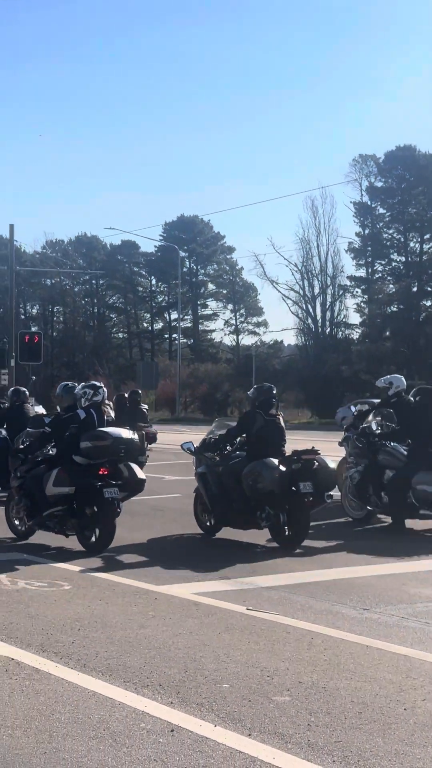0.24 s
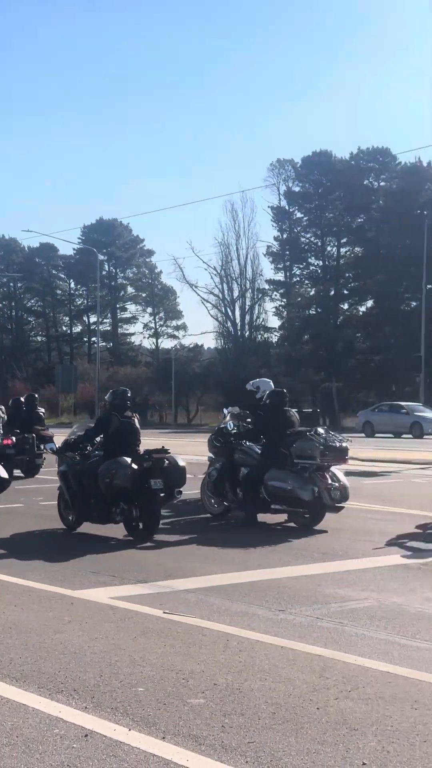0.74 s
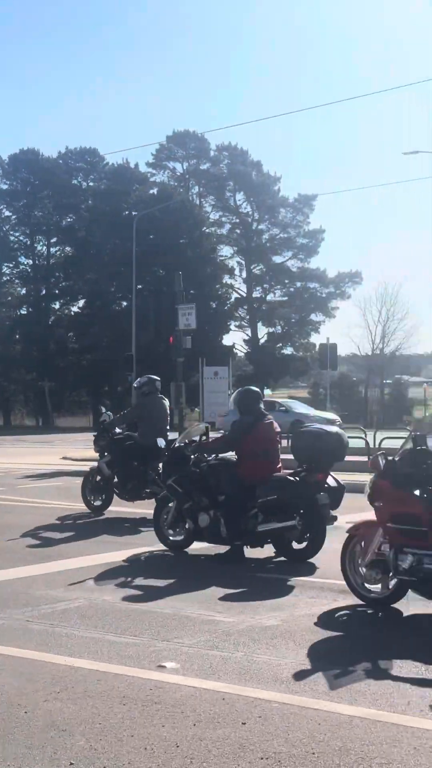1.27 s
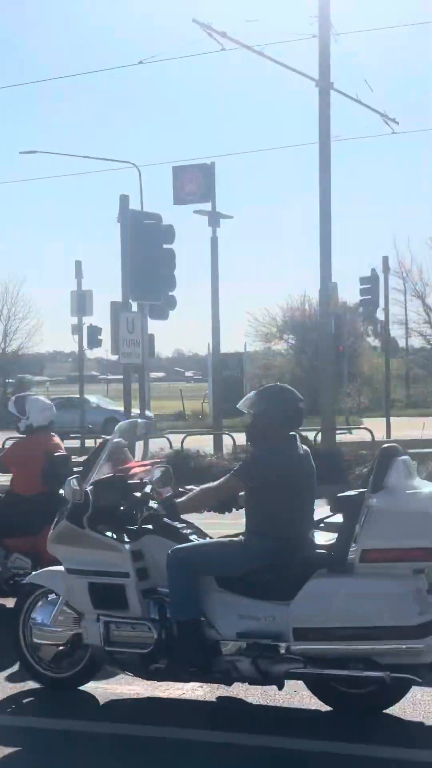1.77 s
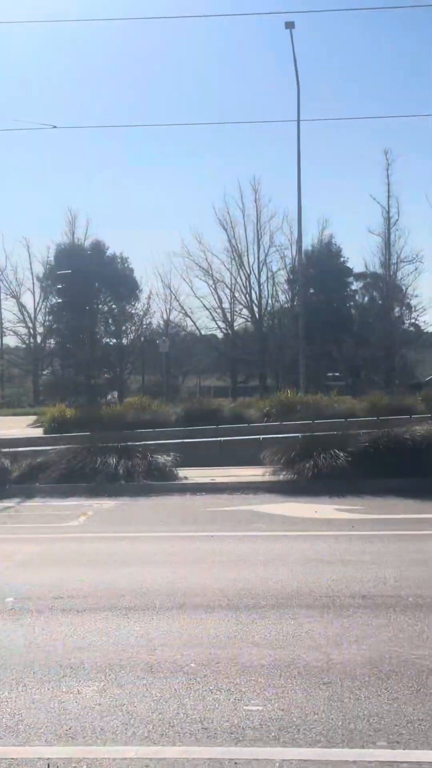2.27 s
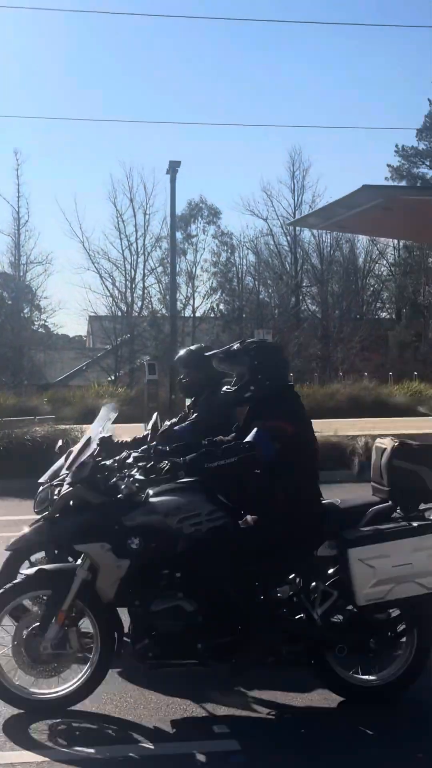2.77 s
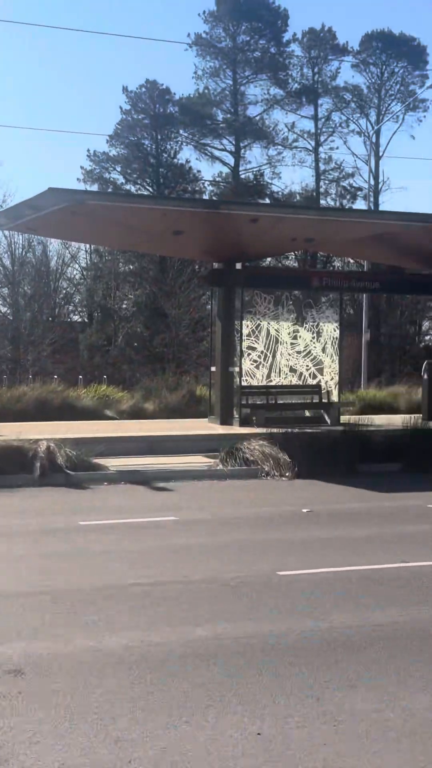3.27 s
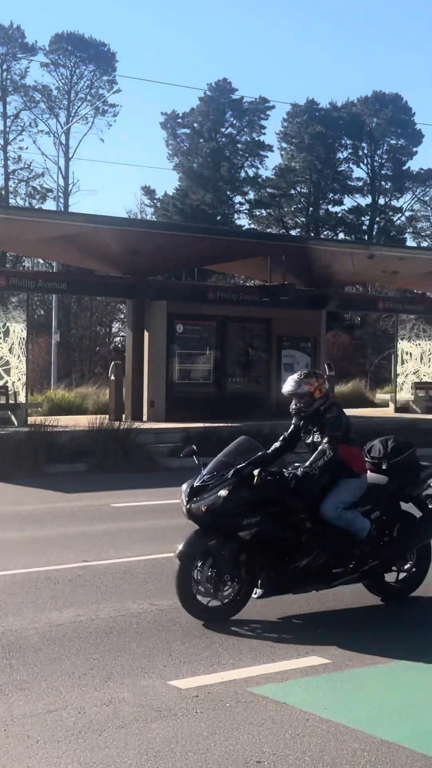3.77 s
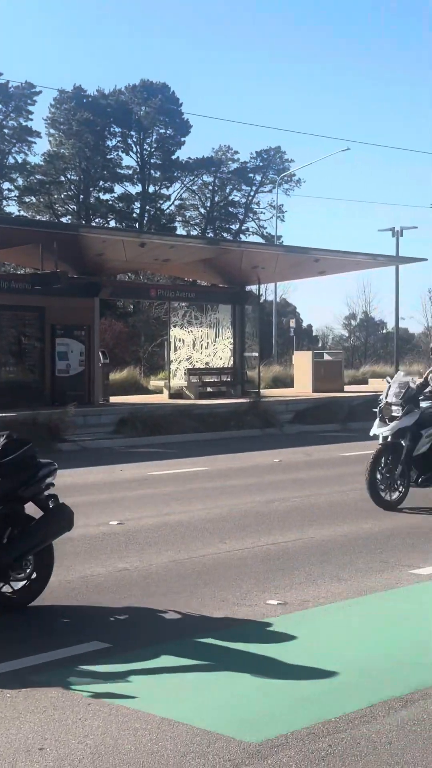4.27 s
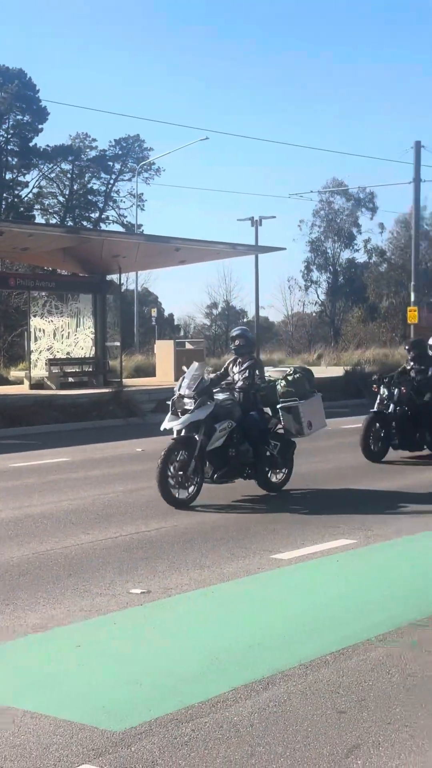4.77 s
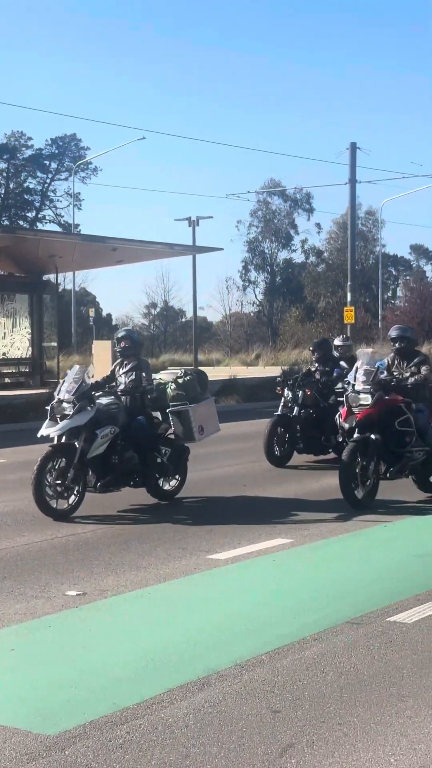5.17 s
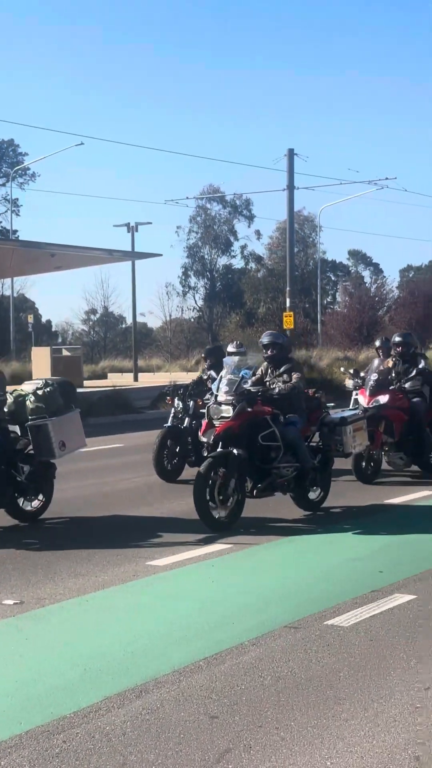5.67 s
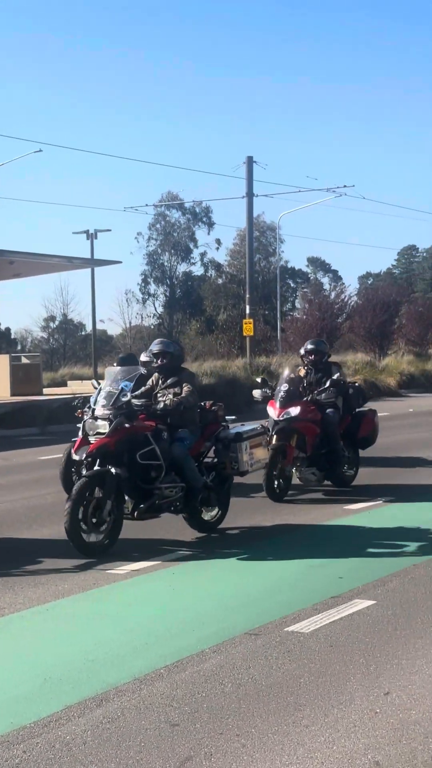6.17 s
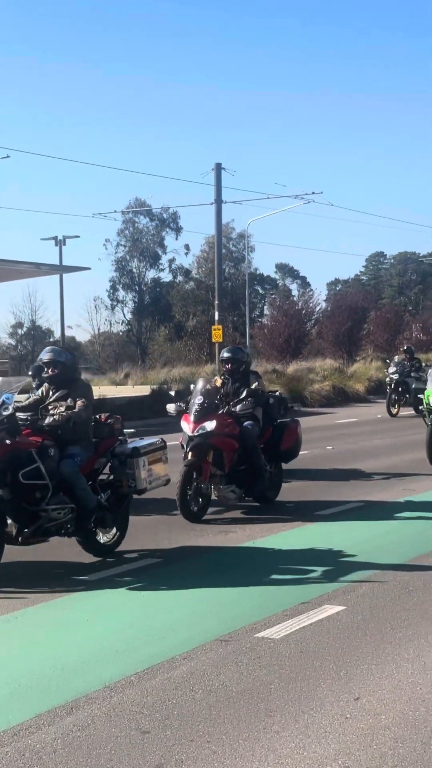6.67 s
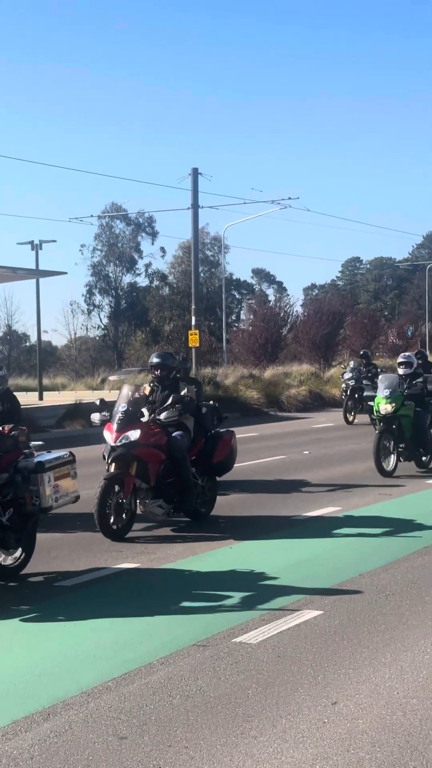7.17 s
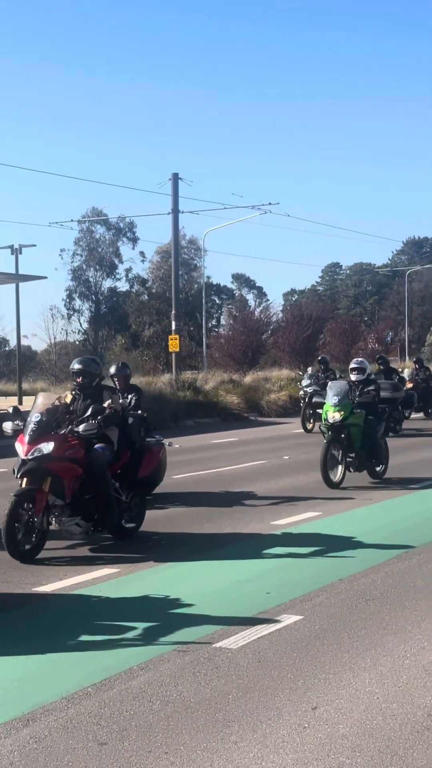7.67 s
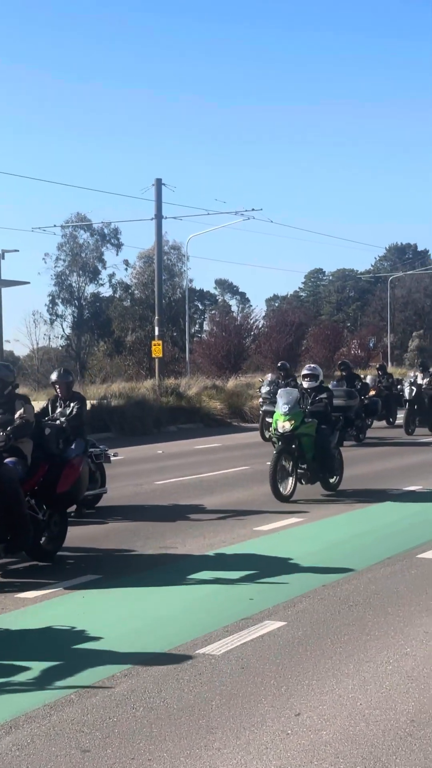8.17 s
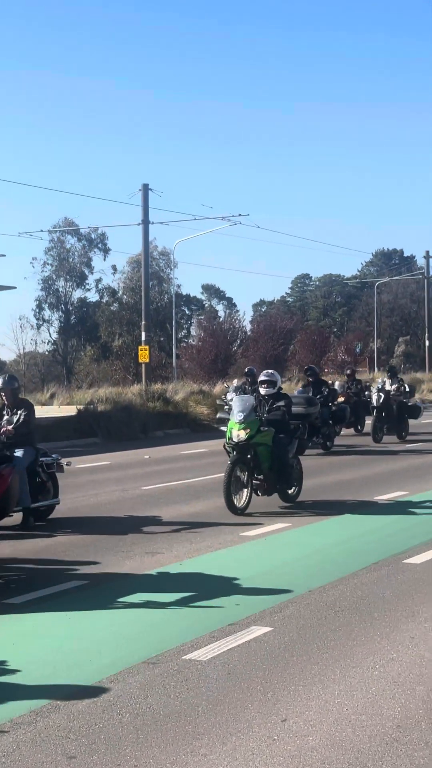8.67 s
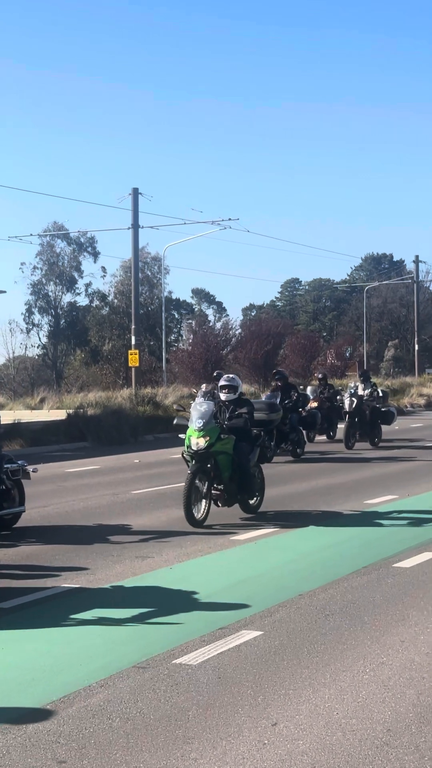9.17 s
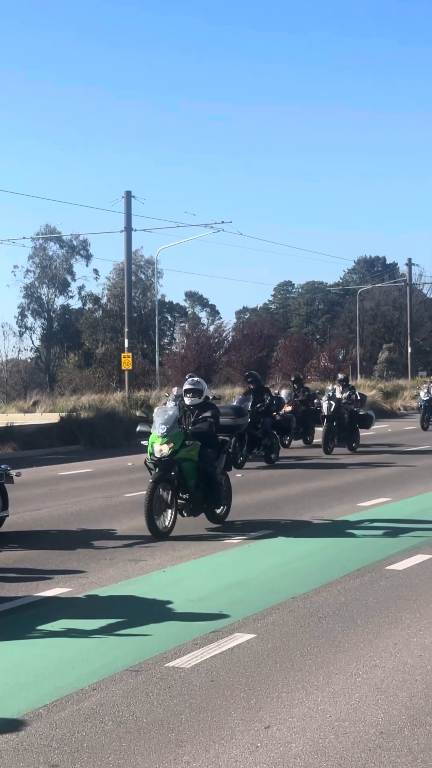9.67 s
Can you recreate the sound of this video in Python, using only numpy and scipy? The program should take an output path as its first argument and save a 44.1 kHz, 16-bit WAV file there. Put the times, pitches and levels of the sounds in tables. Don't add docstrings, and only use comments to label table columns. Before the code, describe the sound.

Many motorcycle engines merge into a low, uneven throb passing close by, with tyre roar, metallic rattle, brake squeaks and single exhaust pops.

```python
import sys
import numpy as np
from scipy import signal
from scipy.fft import rfft, irfft
from scipy.io import wavfile
from scipy.ndimage import uniform_filter1d

SR = 44100
rng = np.random.default_rng(int(sys.argv[2]) if len(sys.argv) > 2 else 0)


def generate_wav(signal):
    frames = np.transpose(np.atleast_2d(signal))
    scaled = np.clip(frames, -1, 1) * 32767
    pcm = np.round(scaled).astype(np.int16)
    wavfile.write(sys.argv[1], SR, pcm)


def amplitude_ratio(level_db):
    exponent = np.asarray(level_db, float) / 20
    return 10 ** exponent


N = 437472
TIME = np.arange(N) / SR


def evened(x):
    return x / np.sqrt(np.mean(x ** 2) + 1e-20)


def smooth_twice(x, first, second):
    return uniform_filter1d(uniform_filter1d(x, size=first), size=second)


def read(points, hz):
    f, value = np.transpose(points)
    return np.interp(np.log(hz + 1), np.log(f + 1), value)


def curve(rows, column):
    rows = np.asarray(rows, float)
    return np.interp(TIME, rows[:, 0], rows[:, column])


def bumps(rows, column):
    t = TIME[::64]
    return np.interp(TIME, t, sum(row[column] * np.exp(-((t - row[0]) / row[1]) ** 2) for row in rows))


def band(x, low_hz, high_hz):
    return signal.sosfiltfilt(signal.butter(2, [low_hz, high_hz], "band", fs=SR, output="sos"), x)


def coloured(x, spectrum, size=8192):
    gain_db = read(spectrum, abs(np.fft.fftfreq(size, 1 / SR)))
    log_gain = np.log(amplitude_ratio(np.maximum(gain_db, -100)))
    phase = signal.hilbert(log_gain).imag
    taps = np.fft.ifft(np.exp(log_gain - 1j * phase)).real[:size // 2]
    return signal.oaconvolve(x, taps)[:N]


def noise(spectrum, patchy_db, flicker_db, size=512):
    frames, hz = 4 * N // size + 5, np.fft.rfftfreq(size, 1 / SR)
    a, b, patches = rng.standard_normal((frames, len(hz), 3)).T
    patches = uniform_filter1d(patches, size=8, axis=0)
    patches = evened(uniform_filter1d(patches, size=24, axis=1))
    flicker = evened(uniform_filter1d(rng.standard_normal(frames), size=6))
    level_db = read(spectrum, hz)[:, None] + patchy_db * patches + flicker_db * flicker
    z = (a + 1j * b) * amplitude_ratio(level_db)
    return evened(signal.istft(z, nperseg=size, noverlap=3 * size // 4)[1][:N])


def firings(rate, share=.5, wander=.02):
    drift = evened(smooth_twice(rng.standard_normal(N // 100 + 1), SR // 200, SR // 400))
    drift = np.repeat(drift, repeats=100)[:N]
    turns = np.cumsum(rate * (1 + wander * drift)) / SR + rng.random()
    return np.diff(np.floor(turns) + np.floor(turns + share), prepend=0).clip(0, 1)


def scattered(clicks, decay, paths=8):
    t, path = np.arange(SR // 8) / SR, rng.integers(0, paths, N)
    taps = rng.standard_normal((paths, len(t))) * (rng.random((paths, len(t))) < .01)
    taps = taps * np.exp(-t / decay) * (t > .003)
    colour = rfft(taps)
    shared = np.sqrt(np.mean(abs(colour) ** 2, axis=0))
    taps = irfft(colour / shared, len(t))
    return evened(sum(signal.oaconvolve(clicks * (path == k), taps[k])[:N] for k in range(paths)))


def whistle(rows, glide, rise, fade_db, wobble):
    out = np.zeros(N)
    for start, length, from_hz, db in rows:
        u = np.arange(0, length, 1 / SR) / length
        unsteady = evened(uniform_filter1d(rng.standard_normal(SR)[:len(u)], size=200))
        hz = from_hz * (1 + glide * u + wobble * unsteady)
        fade = amplitude_ratio(fade_db * np.maximum(u - rise, 0) / (1 - rise))
        shape = np.minimum(u / rise, 1) ** 2 * fade * signal.windows.tukey(len(u), .3)
        tone = np.sqrt(2) * amplitude_ratio(db) * shape * np.sin(2 * np.pi * np.cumsum(hz) / SR)
        out[round(start * SR):][:len(u)] = tone
    return out


# time in seconds, loudness in dB over middle level.
APPROACH = [(0, -0.5), (.55, -0.5), (1.1, 0), (1.7, -1), (2.2, -0.5), (3, -0.5), (3.6, -0.5), (4.1, 0),
            (4.6, -0.5), (5.3, 0), (5.8, 0), (6.2, 0.5), (6.8, 1), (7.5, 1.5), (8.1, 1.5), (8.7, 2),
            (9.3, 2), (9.92, 2.5)]


def nearness_db():
    return curve(APPROACH, 1)


# time in seconds, stay in seconds, then clatter, lower rattle
# and tyre roar, each in dB.
CLOSE_PASSES = [
    (1.75, 0.95, 1.3, -4, -0.1),
    (2.8, 0.28, .6, 3, 1),
    (3.5, 0.18, 3, -3, 0.3),
    (3.95, 0.11, 0.8, -2.5, 1),
    (5.3, 0.43, 1.1, -1.1, 1.5),
    (6.8, .3, -0.8, 2, -0.5),
    (8.55, 0.16, .8, 1.5, 0.1),
    (9.3, .3, .5, 1.5, .3),
]


def passing_db(column):
    return bumps(CLOSE_PASSES, column)


# time in seconds, treble gain in dB.
PHONE_AIM = [(0, -3), (.9, -2.5), (2, .5), (2.8, 0), (4.5, 0), (6.3, 0), (9.92, 1)]


def treble_db():
    return .9 * nearness_db() + curve(PHONE_AIM, 1) + passing_db(column=2)


# frequency in Hz, density in dB per Hz.
HISS_SPECTRUM = [(9000, -39.5), (10500, -13.5), (13500, -17), (14500, -10.5), (15600, -2), (16500, -36.5)]


def air():
    stirred_db = bumps([(2.1, .6, 3)], column=2)
    return amplitude_ratio(-75.5 + stirred_db) * noise(HISS_SPECTRUM, patchy_db=1.5, flicker_db=-1.0)


# time in seconds, length in seconds, level in dB.
PORT_GUSTS = [(0.154, 0.22, -27), (0.545, 0.11, -29), (.75, 0.11, -26.5), (0.965, 0.14, -22.5),
              (1.2, .15, -34), (1.36, 0.084, -26), (1.57, .06, -31.5), (1.75, .15, -34.5),
              (2.007, .06, -25.5), (2.22, .18, -25.5), (2.69, 0.053, -28), (2.947, 0.083, -21),
              (3.12, 0.036, -29), (3.321, 0.052, -21.5), (3.56, 0.041, -30), (3.81, .15, -42),
              (4.12, 0.13, -34), (5.125, 0.068, -28.5), (5.95, 0.14, -44), (6.443, .12, -39.5),
              (7.99, 0.017, -39), (8.823, 0.069, -31.5), (9.0, 0.11, -38), (9.156, 0.039, -29.5),
              (9.513, 0.12, -43)]


def wind_db(calm_db=-56):
    gusts = [(s, length, amplitude_ratio(2 * db)) for s, length, db in PORT_GUSTS]
    return 10 * np.log10(amplitude_ratio(2 * calm_db) + bumps(gusts, column=2))


# frequency in Hz, density in dB per Hz.
WIND_SPECTRUM = [(30, -22.5), (60, 3.5), (100, 6.5), (200, 5.5), (300, 1), (400, -11.5), (600, -13.5),
                 (950, -22.5), (1300, -46.5), (2000, -77)]


def wind():
    return amplitude_ratio(-0.5 + wind_db()) * noise(WIND_SPECTRUM, patchy_db=2.5, flicker_db=0.5, size=1024)


# frequency in Hz, density in dB per Hz.
SCATTER_SPECTRUM = [(150, -38), (250, -11.5), (350, -2.5), (697, -13.5), (833, -7), (1420, -15.5),
                    (1900, -40.5), (2150, -73.5), (4700, -79.5), (5300, -42.5), (5600, -26.5),
                    (7400, -20.5), (8720, -31), (10800, -39), (12500, -34), (14000, -38.5), (15700, -41)]


def scattered_width():
    swell_db = .6 * (treble_db() - 1)
    return amplitude_ratio(-44.5 + swell_db) * noise(SCATTER_SPECTRUM, patchy_db=2, flicker_db=0.5, size=1024)


# frequency in Hz, density in dB per Hz.
ROAR_SPECTRUM = [(290, -18.5), (500, -5), (617, -2.5), (679, 0), (794, -2.5), (962, 1), (1080, 0),
                 (1280, -11.5), (1370, -8), (1510, -5), (1600, -10), (1840, -22), (2100, -24), (2730, -53),
                 (4620, -120)]


def tyre_roar():
    level_db = -38.5 + 1.3 * nearness_db() + passing_db(column=4)
    return amplitude_ratio(level_db) * noise(ROAR_SPECTRUM, patchy_db=0.74, flicker_db=0.5, size=1024)


# frequency in Hz, density in dB per Hz.
METAL_SPECTRUM = [(1120, -35.5), (1900, -12), (2300, -5), (2720, -1.5), (4820, -5.5), (5720, -3),
                  (7480, -8.5), (8720, -21), (9600, -26), (10200, -36), (12000, -71)]
# lower edge in Hz, upper edge in Hz.
TICKING_PARTS = [
    (2200, 2700),
    (3200, 4200),
    (4600, 6400),
    (6400, 8600),
]
# time in seconds, ticks per second, level in dB.
VALVE_TRAIN = [(1.0, 20.8, -59), (1.36, 19.7, -59.5), (3.23, 19.7, -53.5), (3.63, 19.4, -53.5),
               (5.0, 19.4, -58.5)]


def clatter(ticks_per_s=150, spread_db=3.0, tick_share=0.28, rattle_db=1):
    burst = rng.standard_normal(200) * np.exp(-np.arange(200) / 40)
    hard_db = spread_db * np.minimum(rng.exponential(1, N), 2.5)
    blows = (rng.random((len(TICKING_PARTS), N)) < ticks_per_s / SR) * amplitude_ratio(hard_db)
    ticks = sum(band(signal.oaconvolve(hits, burst)[:N], *part) for hits, part in zip(blows, TICKING_PARTS))
    ticks = evened(coloured(ticks, METAL_SPECTRUM))
    metal = evened(noise(METAL_SPECTRUM, patchy_db=0.17, flicker_db=0.8) + tick_share * ticks)
    rattle_gain = amplitude_ratio(rattle_db + passing_db(column=3)) - 1
    metal = metal + rattle_gain * band(metal, 2700, 4500)

    beat = firings(curve(VALVE_TRAIN, 1) / 2, 0.42, wander=0.0055) * (TIME > 1) * (TIME < 5)
    k = np.arange(1500)
    tap_shape = np.exp(-k / 350) * (1 - np.exp(-k / 30))
    gate = signal.oaconvolve(beat * amplitude_ratio(1.4 * rng.standard_normal(N)), tap_shape)[:N]
    tap_noise = band(noise(METAL_SPECTRUM, patchy_db=2.5, flicker_db=1.5), 2500, 10000)
    valves = amplitude_ratio(curve(VALVE_TRAIN, 2) - 2.0) * evened(gate * tap_noise)
    return amplitude_ratio(-45.5 + treble_db()) * metal + valves


# start in seconds, length in seconds, pitch in Hz, level in dB.
BRAKE_SQUEAKS = [
    (3.08, .04, 13570, -68),
    (3.22, .08, 13760, -57),
    (4.03, .1, 13850, -66),
    (4.37, .11, 13850, -63),
]


def squeaks():
    return whistle(BRAKE_SQUEAKS, glide=-.013, rise=.25, fade_db=-12, wobble=.001)


# start in seconds, length in seconds, pitch in Hz, level in dB.
CHAIN_CHIRP = [
    (5.49, .07, 7950, -48),
]


def chirp():
    return whistle(CHAIN_CHIRP, glide=-.1, rise=.15, fade_db=-3, wobble=.001)


# start in seconds, length in seconds, pitch in Hz, level in dB.
RUB_WHINE = [
    (6.56, .65, 3160, -53),
]
RUB_FLICK = [
    (7.16, 0.091, 3140, -46),
]
RUB_SLIDE = [
    (7.66, 0.18, 2230, -54),
]


def rubbing():
    whine = whistle(RUB_WHINE, glide=-.002, rise=.06, fade_db=-1.5, wobble=.0025)
    flick = whistle(RUB_FLICK, glide=.035, rise=.6, fade_db=-4, wobble=.0025)
    slide = whistle(RUB_SLIDE, glide=-.09, rise=.4, fade_db=-5, wobble=.006)
    return whine + flick + slide


# start in seconds, length in seconds, pitch in Hz, level in dB.
SHORT_TOOTS = [
    (8.06, .07, 673, -35),
    (8.495, 0.093, 710, -35),
    (8.735, 0.065, 702, -33),
]
RISING_SCUFFS = [
    (3.86, .05, 868, -39),
    (3.92, 0.047, 858, -33.5),
]


def toots_and_scuffs():
    toots = whistle(SHORT_TOOTS, glide=-.03, rise=.4, fade_db=-8, wobble=.001)
    return toots + whistle(RISING_SCUFFS, glide=.2, rise=.3, fade_db=-4, wobble=.001)


# cycles per second, second firing as a share of the cycle, nearest at seconds,
# stay in seconds, level in dB.
PASSING_ENGINES = [(8.935, .44, 0.35, 2, -4), (13.47, .5, 2.6, 2, -5), (16.24, .38, 0.89, 1.9, -3.5),
                   (9.82, .5, 2.65, 2.33, -1), (11.39, .44, 1.79, 1.57, -1.5), (21.63, .5, 5.03, 1.5, -7.5),
                   (7.69, .44, 4.45, 1.87, 3), (19.1, .5, 7.04, 2.75, -4), (17.54, .5, 9.55, 4.1, -3),
                   (8.85, 0.55, 8.57, 1.26, 5.5), (14.203, .42, 5.43, 3.9, -1.5), (22.62, 0.42, 9.0, 2, -3),
                   (18.53, .44, 2.95, 1.2, -1)]
# frequency in Hz, density in dB per Hz.
PIPE_SPECTRUM = [(13, -62), (22, -32), (27, -26.5), (34, -18), (44, -14.5), (60, 0), (75, -0.5), (129, -5),
                 (160, -8.5), (199, -12), (344, -23), (398, -29), (700, -43), (910, -74.5), (1540, -120)]
# time in seconds, level change in dB.
MEETING_FIRINGS = [(0.179, 3.5), (1.361, -3.5), (2.284, -8), (2.351, 1), (2.411, -5.0), (3.43, -11),
                   (3.564, 1), (3.706, -4.7), (4.338, -10), (4.409, 3.5), (4.499, -9), (4.886, -8),
                   (5.069, 4), (5.61, -6.5), (5.646, 5.5), (6.302, -2), (6.817, -6), (6.942, 7.5),
                   (7.132, -8.5), (7.264, 4.9), (7.301, -6.5), (7.46, -11), (7.594, 0.5), (8.878, -3),
                   (8.967, -10), (9.078, -5), (9.15, 5), (9.507, -7), (9.729, -10), (9.819, 1.5)]
# time in seconds, stay in seconds,
# rasp in dB.
THROTTLE_BLIPS = [
    (.6, 0.31, -1.5),
    (1.75, 0.65, 2.5),
    (2.75, 0.12, 1.5),
    (3.4, .12, 4.5),
    (3.85, 0.28, -2),
    (4.6, .3, -1),
    (5.6, 0.27, 0),
    (7.6, 0.84, -2),
    (9.4, 0.25, 0),
]


def exhausts(uneven_db=2, blur=0.21, echo_db=-1.5, echo_decay=0.025, evening=0.35):
    strength = amplitude_ratio(uneven_db * rng.standard_normal(N))
    clicks = np.zeros(N)
    for rate, share, near, stay, db in PASSING_ENGINES:
        clicks += amplitude_ratio(db) * np.exp(-((TIME - near) / stay) ** 2) * firings(rate, share)
    clicks = clicks * strength
    clicks = clicks / np.sqrt(uniform_filter1d(clicks ** 2, size=SR // 2))
    clicks = clicks + amplitude_ratio(echo_db) * scattered(clicks, echo_decay)
    drive = (1 - blur) * evened(clicks) + blur * rng.standard_normal(N)
    rumble = signal.lfilter(*signal.butter(2, 30, "high", fs=SR), coloured(drive, PIPE_SPECTRUM))
    power = smooth_twice(rumble ** 2, SR // 12, SR // 24)
    rumble = evened(rumble / (power + 1e-9) ** evening)
    rasp = band(rumble, 230, 1500)
    throb_db = bumps([(s, 0.015, db) for s, db in MEETING_FIRINGS], column=2)
    rasp_db = bumps(THROTTLE_BLIPS, column=2) - 1.0
    return amplitude_ratio(-14 + nearness_db()) * (amplitude_ratio(throb_db) * (rumble - rasp) + amplitude_ratio(rasp_db) * rasp)


# time in seconds, peak in dB.
STRAY_FIRINGS = [
    (0.177, -32),
    (1.632, -11),
    (2.839, -10),
    (6.105, -16),
    (6.599, -14),
    (7.034, -13),
]
# time in seconds, firings per second.
SLOW_ENGINE = [(5.712, 12.68), (6.15, 12.36), (6.45, 13.83), (6.85, 13.51), (7.1, 12.27), (7.5, 12.15),
               (8.1, 11.99), (8.9, 11.6), (9.92, 11.84)]
# time in seconds, peak in dB.
SLOW_ENGINE_EFFORT = [(5.7, -24), (6.3, -21.5), (6.9, -19), (7.4, -22.5), (7.7, -20), (8.3, -19.5),
                      (8.85, -26), (9.1, -19.5), (9.9, -22)]


def pops(hz=370, width=0.0017, thump_hz=80, thump_db=9, crack_db=0.5, thump_decay=0.011, lag=0.0042, lean=0.18):
    turns = np.cumsum(curve(SLOW_ENGINE, 1) * (TIME >= SLOW_ENGINE[0][0])) / SR
    uneven_db = 2 * rng.standard_normal(N).clip(-2, 1.5)
    blows = np.diff(np.ceil(turns), prepend=0) * amplitude_ratio(curve(SLOW_ENGINE_EFFORT, 1) + uneven_db)
    for s, db in STRAY_FIRINGS:
        blows[round((s + .005) * SR)] = amplitude_ratio(db - 11)
    t = np.arange(-400, 3000) / SR
    crack = amplitude_ratio(crack_db) * np.cos(2 * np.pi * hz * t) * np.exp(-(t / width) ** 2)
    late = np.maximum(t - lag, 0)
    thump = amplitude_ratio(thump_db) * np.sin(2 * np.pi * thump_hz * late) * np.exp(-late / thump_decay)
    shapes = [crack * (1 - lean) + thump, crack * (1 + lean) + thump]
    return np.array([signal.oaconvolve(blows, shape)[400:N + 400] for shape in shapes])


def scene():
    roar, metal = tyre_roar(), clatter()
    brake, chain = squeaks(), chirp()
    mid = air() + roar + metal + brake + chain + rubbing() + toots_and_scuffs() + exhausts()
    mid += -.2 * np.exp(-(TIME / .003) ** 2)
    side = wind() + scattered_width() + 0.93 * brake + 0.54 * chain
    side += signal.hilbert(0.18 * roar - 0.31 * band(metal, 6270, 9500)).imag
    return np.array([mid + side, mid - side]) + pops()


# frequency in Hz, share of the cut.
DUCKED_BAND = [(320, 0.002), (400, 1), (520, 1), (650, 0), (850, 0.003), (1100, 0.041)]


def wind_filter(mid, from_db=-33, cut_per_db=1.43, rest_db=-.5):
    hz, t, z = signal.stft(mid, SR, nperseg=1024)
    ragged = uniform_filter1d(rng.standard_normal(z.T.shape).T, size=3, axis=0)
    ragged = evened(uniform_filter1d(ragged, size=4, axis=1))
    excess_db = np.maximum(np.interp(t, TIME, wind_db()) - from_db, 0)
    cut_db = read(DUCKED_BAND, hz)[:, None] * (rest_db + cut_per_db * excess_db)
    cut_db = cut_db * np.maximum(0.98 + 0.55 * ragged, 0)
    return signal.istft(z * amplitude_ratio(-cut_db), SR, nperseg=1024)[1][:N]


def top_cut(x):
    return signal.sosfilt(signal.butter(12, 15790, fs=SR, output="sos"), x)


def record(dry):
    mid, side = (dry[0] + dry[1]) / 2, (dry[0] - dry[1]) / 2
    mid = wind_filter(mid)
    x = signal.lfilter(*signal.butter(2, 31, "high", fs=SR), [mid + side, mid - side])
    ceiling = 1.45
    return top_cut(ceiling * np.tanh(0.99 * x / ceiling))


dry = scene()
out = record(dry)
generate_wav(out)
```